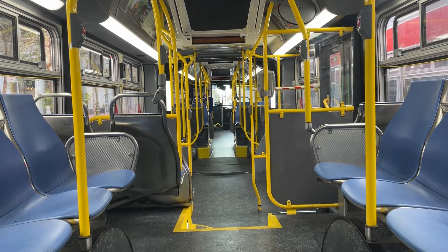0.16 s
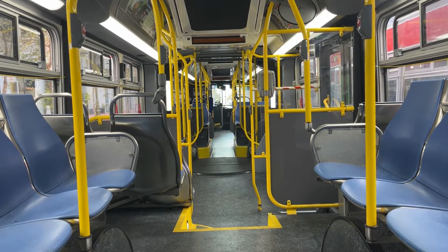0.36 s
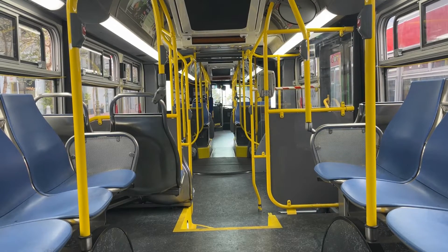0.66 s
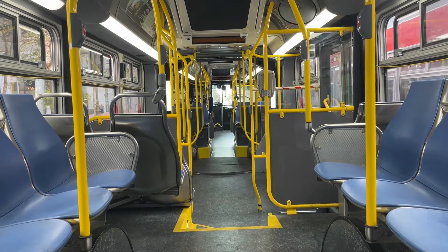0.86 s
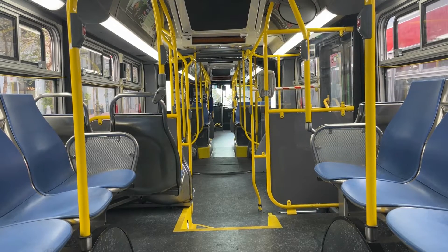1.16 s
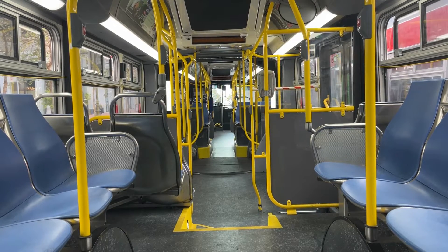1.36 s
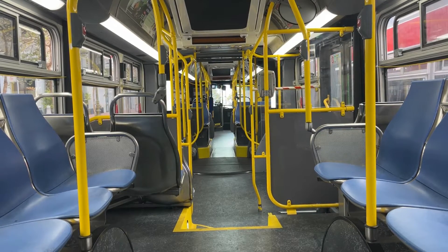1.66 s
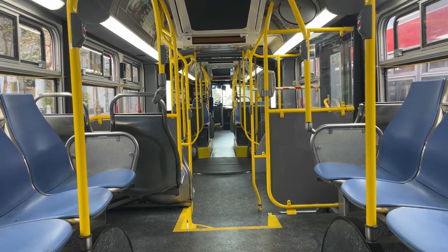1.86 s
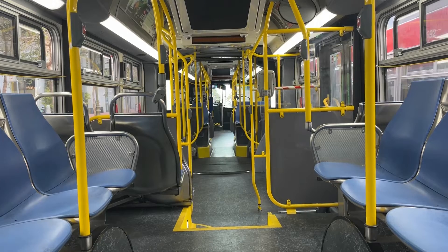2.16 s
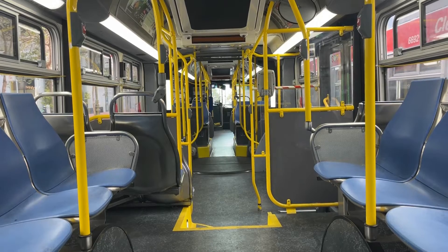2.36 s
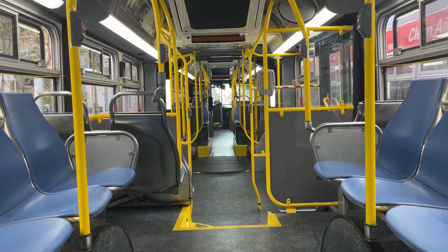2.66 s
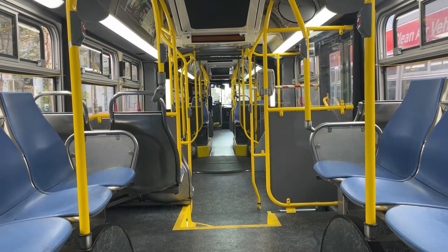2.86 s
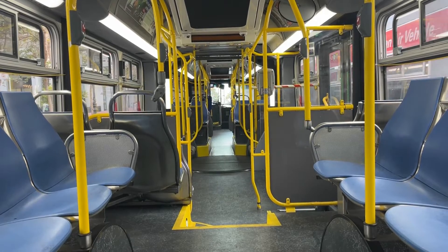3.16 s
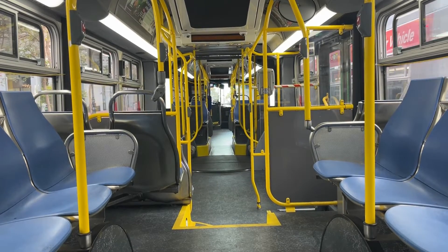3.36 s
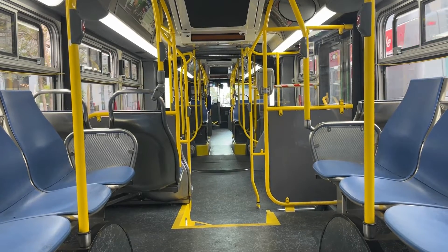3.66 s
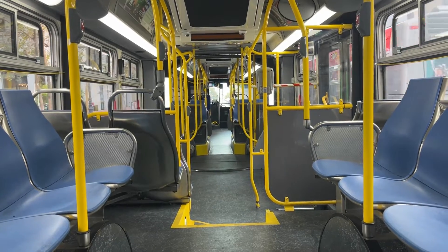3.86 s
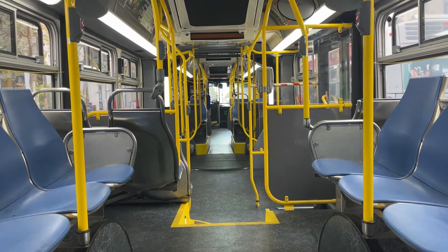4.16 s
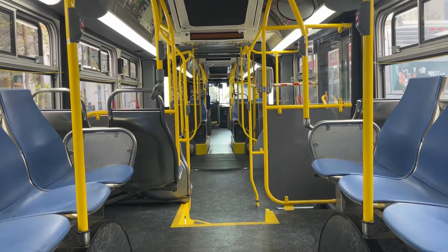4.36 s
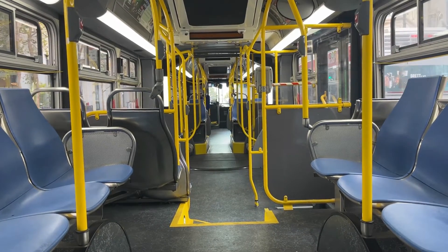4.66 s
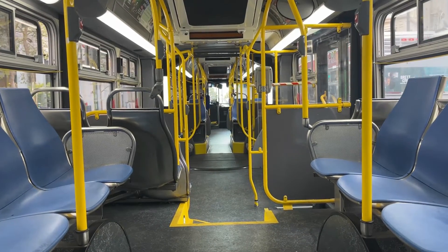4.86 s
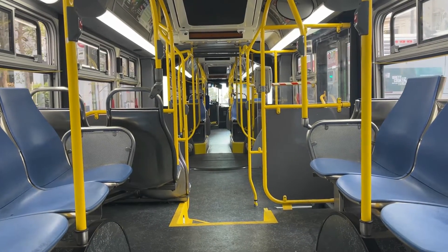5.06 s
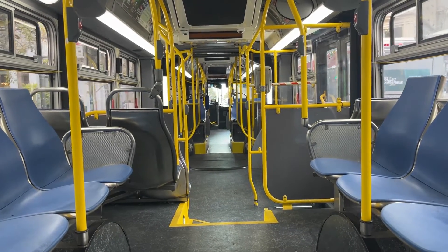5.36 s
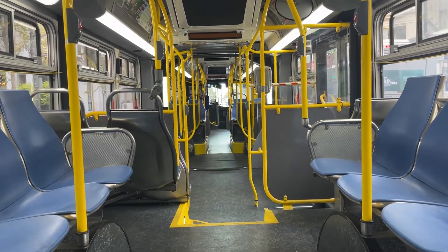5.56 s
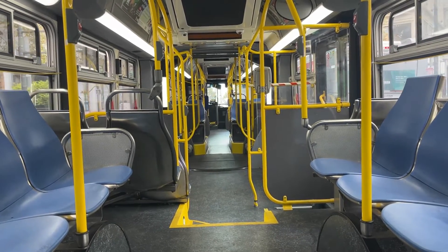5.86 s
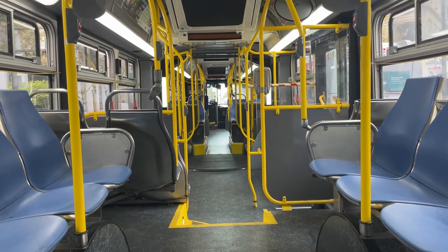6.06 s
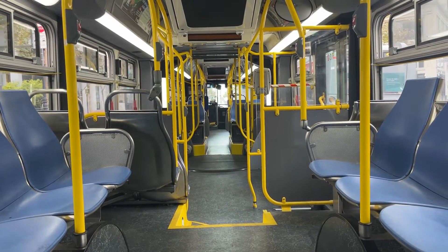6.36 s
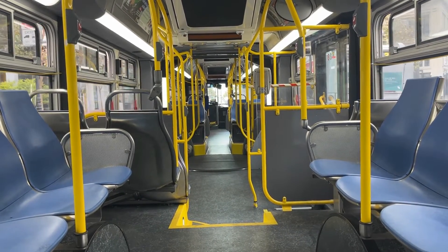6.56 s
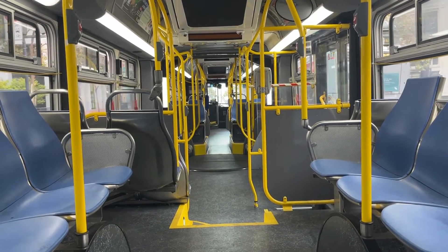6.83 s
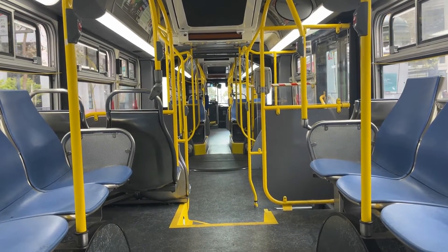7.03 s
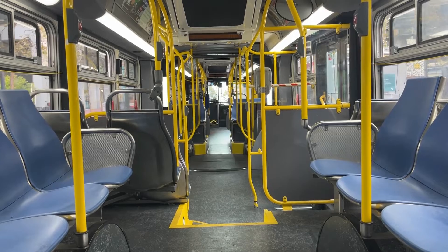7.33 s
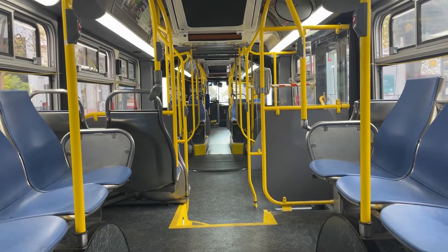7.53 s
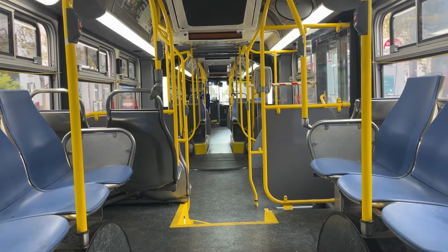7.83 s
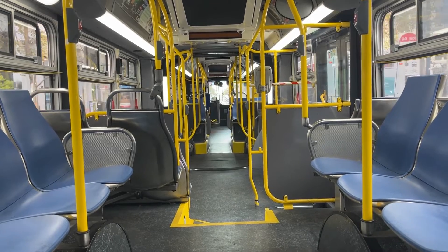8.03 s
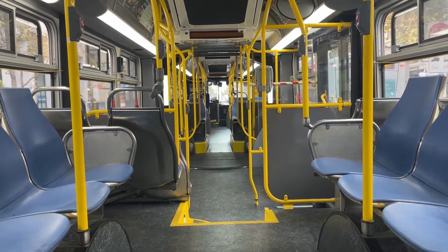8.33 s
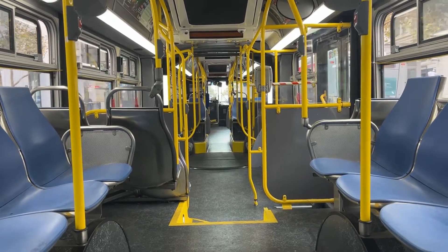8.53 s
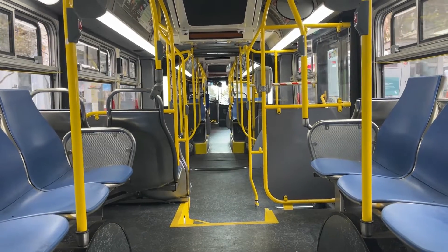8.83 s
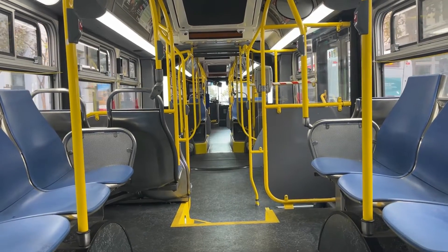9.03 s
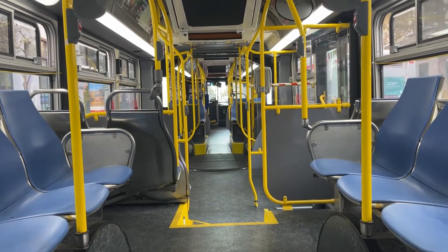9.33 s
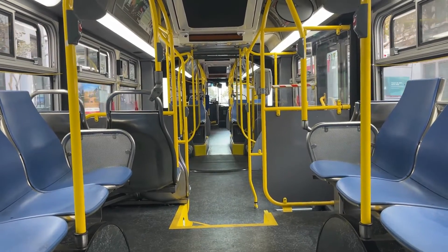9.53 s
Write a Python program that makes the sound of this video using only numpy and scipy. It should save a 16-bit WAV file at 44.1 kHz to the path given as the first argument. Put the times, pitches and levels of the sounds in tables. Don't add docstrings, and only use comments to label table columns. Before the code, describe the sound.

A bus cabin drones at idle, brake air sneezes out, and the bus pulls away with growing engine growl, floor boom and thin high squeaks.

```python
import sys
import numpy as np
from scipy import signal
from scipy.fft import rfft, irfft, next_fast_len
from scipy.io import wavfile
from scipy.ndimage import uniform_filter1d

SR = 44100
rng = np.random.default_rng(int(sys.argv[2]) if len(sys.argv) > 2 else 0)


def undo_db(level):
    steps = np.asarray(level, float) / 20
    return 10 ** steps


def dump_mix(stems):
    frames = np.atleast_2d(stems).T
    limited = np.clip(frames, -1, 1)
    pcm = np.round(limited * 32767).astype(np.int16)
    wavfile.write(sys.argv[1], SR, pcm)


N = 427329
TIME = np.arange(N) / SR
SIZE = next_fast_len(N)
BINS = np.arange(SIZE // 2 + 1) * SR / SIZE + 1e-3


def columns(table):
    s, *rest = np.transpose(table)
    return [np.interp(TIME, s, column) for column in rest]


def on_bins(points):
    hz, value = np.transpose(points)
    return np.interp(np.log(BINS), np.log(hz), value)


def resonances(table, hz):
    return sum(db / (1 + ((hz - centre) / width) ** 2) for centre, width, db in table)


def walk(rate, channels=1):
    spacing = int(SR / rate)
    knots = rng.standard_normal((channels, N // spacing + 2))
    step = (1 - np.cos(np.pi * (np.arange(N) % spacing) / spacing)) / 2
    i = np.arange(N) // spacing
    return 1.15 * (knots[:, i] * (1 - step) + knots[:, i + 1] * step)


def noise(colour, lo_hz, hi_hz):
    gain = undo_db(on_bins(colour)) * (BINS > colour[0][0]) * (BINS < colour[-1][0])
    band = gain[(BINS > lo_hz) & (BINS < hi_hz)]
    gain = gain / np.sqrt(np.sum(band ** 2) * 2 / SIZE)
    return irfft(rfft(rng.standard_normal((3, SIZE))) * gain, SIZE)[:, :N]


def tone(hz, width_hz, steady=0.):
    wander = steady + walk(width_hz, channels=3) + 1j * walk(width_hz, channels=3)
    carrier = np.exp(2j * np.pi * np.cumsum(hz) / SR)
    return (carrier * wander).real / np.sqrt(1 + steady ** 2 / 2)


# t/s, turns per second
CRANK_SPEED = [(0.0, 11.71), (1.0, 11.62), (1.25, 12.02), (1.5, 12.43), (2.0, 12.78), (2.5, 13.54),
               (3.0, 14.98), (3.5, 16.27), (4.0, 17.23), (4.5, 18.61), (5.0, 20.03), (5.5, 20.99),
               (6.0, 21.48), (6.3, 22.77), (6.6, 23.55), (7.0, 22.52), (7.4, 21.55), (8.0, 22.25),
               (8.5, 22.6), (9.0, 23.15), (9.69, 23.91)]
STRONG_ORDERS = (3, 4.5, 6, 8)
# t/s, level/dB of orders 3, 4.5, 6 and 8, load level/dB on the weaker orders
ORDER_LEVELS = [(0.0, -50, -41, -42, -30.5, 1), (0.75, -42, -49, -40, -31, 2),
                (1.0, -48, -45.0, -35, -30.5, 1), (1.25, -50, -50, -42.0, -33, -3),
                (1.5, -41, -45.0, -32, -42, -0.5), (1.75, -31, -43, -34, -32.5, -5),
                (2.0, -35, -45.0, -33, -41, -4), (2.25, -36, -47, -48, -30, 0.0),
                (2.5, -31.0, -45.0, -42, -29.0, 1), (2.75, -28, -40, -45, -32.5, -1),
                (3.0, -26, -45.0, -45, -34.0, -4.5), (3.25, -29, -36, -47, -28, -3),
                (3.5, -44, -39.0, -37.0, -25.5, -0.5), (3.75, -26.5, -39.0, -45.0, -46, -9),
                (4.0, -29, -42.0, -46, -27.5, -0.5), (4.25, -31, -41, -41, -27.5, -3.5),
                (4.5, -18, -33, -44, -30.5, -5), (4.75, -21.0, -47, -33, -37, -1),
                (5.0, -21.5, -30.5, -26, -27.5, 2.5), (5.25, -33, -28, -37, -21.5, 0.5),
                (5.5, -36, -29.0, -36.0, -34, 3.5), (5.75, -23, -30.0, -49, -39, 3),
                (6.0, -26, -40, -37, -30, 6), (6.3, -31, -24.5, -24, -25.5, -1.5),
                (6.6, -27, -19.5, -32, -25, 2.5), (6.75, -36, -19.5, -31, -28.5, 0),
                (7.0, -23, -28.5, -23, -45, 4), (7.25, -33, -24.5, -30, -27, 1),
                (7.4, -27.5, -32, -30, -32.5, 1.5), (7.75, -24, -28, -27, -27.5, 3.5),
                (8.0, -45.0, -26, -24.5, -33, 3.5), (8.25, -22, -31, -23, -41, 4),
                (8.5, -21.5, -29, -26.5, -34, 2.5), (8.75, -21.5, -24.0, -24, -39, 5),
                (9.0, -28, -22.5, -31, -32.5, 2.5), (9.25, -25, -21, -28.5, -35, 7),
                (9.69, -30, -28, -49, -50, 1.5)]
# multiple of the crank rate, level/dB
WEAK_ORDERS = [(1.5, -48), (2, -45), (2.5, -44), (4, -46), (5, -47), (7, -51), (9, -46), (10, -49.5),
               (12, -49.5), (14, -48), (15, -47), (16, -48.5)]
# f/Hz, width/Hz, level/dB
CABIN_MODES = [(60.4, 4.9, -3), (201.5, 5.1, 9), (142.4, 5.5, 11.5), (171.2, 4.9, 14), (219.5, 7.8, 16.5),
               (264.5, 5.8, 15.5), (312.7, 10.5, 17.5), (342.3, 4.6, 11.5)]


def engine():
    (rev,), (*strong, load_db) = columns(CRANK_SPEED), columns(ORDER_LEVELS)
    turn = 2 * np.pi * np.cumsum(rev) / SR
    levels = list(zip(STRONG_ORDERS, strong))
    for order, db in WEAK_ORDERS:
        levels.append((order, db + load_db + resonances(CABIN_MODES, order * rev)))
    opposed = np.array([[1], [-1]])
    out = np.zeros((2, N))
    for order, db in levels:
        phase = order * turn + rng.uniform(0, 2 * np.pi) + 0.13 * walk(4)[0]
        same = np.sin(phase)
        apart = np.sin(phase + 1.33 + 0.55 * walk(1.56)[0])
        apart_db = np.interp(order * rev, (40, 70, 300), (-15, -4, -7))
        size = np.sqrt(2) * undo_db(db + walk(6)[0])
        out += size * (same + undo_db(apart_db) * apart * opposed)
    return out


# t/s, f/Hz
GEAR_PITCH = [(4.1, 350), (4.6, 392), (5, 470), (5.2, 505), (5.6, 580), (6, 640), (6.3, 685), (6.7, 730),
              (7.1, 780), (7.5, 820), (8, 862), (8.5, 905), (8.8, 938), (9.3, 1000), (9.69, 1040)]
# t/s, level/dB
GEAR_LEVEL = [(4.1, -47), (4.6, -43), (5.2, -29.5), (5.6, -43), (6.2, -36), (6.7, -41), (7.2, -40.5),
              (8, -48.5), (8.7, -41), (9.0, -54), (9.3, -40), (9.69, -49)]


def gear():
    (hz,), (db,) = columns(GEAR_PITCH), columns(GEAR_LEVEL)
    return undo_db(db) * tone(hz, 60., steady=.5) * (TIME > GEAR_PITCH[0][0])


# t/s, road boom level/dB, panel drone level/dB, rattle and rush level/dB
BODY_LEVELS = [(0.0, -41.5, -26.5, -43), (0.38, -50, -27, -39.5), (0.73, -35, -31.5, -39.5),
               (1.0, -36, -25.5, -40), (1.32, -31, -24, -41), (1.56, -28, -22, -35.5),
               (1.75, -38.5, -25, -40), (2.08, -42, -25.5, -36), (2.53, -38.5, -24, -36),
               (2.97, -35, -22, -35), (3.29, -42, -23, -35.5), (3.48, -31, -22, -35), (3.67, -54, -19, -36),
               (3.88, -32, -21, -35.5), (4.13, -37, -20.5, -36), (4.34, -25, -18, -36),
               (4.48, -33.5, -20.5, -35.5), (4.67, -25.5, -16.5, -37), (5.05, -31, -18, -34),
               (5.23, -29, -18.5, -34.5), (5.48, -30.5, -18.5, -34), (5.86, -39, -16, -34),
               (6.18, -25, -17, -34.5), (6.45, -31.5, -18.5, -35.5), (6.77, -30, -23.5, -34),
               (7.04, -23.5, -20.5, -35.5), (7.29, -22.5, -21, -35.5), (8.15, -23, -22.5, -34.5),
               (8.47, -22, -26.5, -34), (8.66, -23, -19.5, -31), (8.98, -17.5, -20.5, -32.5),
               (9.2, -24, -22.5, -34), (9.42, -10.5, -20.5, -34), (9.58, -13, -18.5, -31),
               (9.69, -9, -19.5, -29.5)]
# f/Hz, level/dB per Hz
BOOM_COLOUR = [(12, -46), (20, -15), (54, 6.5), (103, -3.5), (120, -1.5), (160, -41), (260, -120)]
# f/Hz, level/dB per Hz
DRONE_COLOUR = [(40.0, -19), (60.0, -4.5), (85.0, -4.5), (115.0, -7.5), (160.0, -6.5), (200.0, -6),
                (240.0, -14.5), (285.0, -12), (340.0, -8), (410.0, -10), (480.0, -18.5), (560.0, -22),
                (700.0, -17.5)]
# f/Hz, level/dB per Hz
RUSH_COLOUR = [(450.0, -4.5), (650.0, -7.5), (850.0, -9.5), (1100.0, -10.5), (1400.0, -10.5), (1900.0, -19),
               (2700.0, -23.5), (3300.0, -29), (4500.0, -29.5), (6500.0, -35.5), (8200.0, -38),
               (11000.0, -43.5), (14000.0, -48.0), (15300.0, -49)]


def body():
    boom_db, drone_db, rush_db = columns(BODY_LEVELS)
    rolling_db = np.interp(TIME, (1.5, 4.5), (-11, -2.5))
    bumps_db = 0.92 * walk(3.9)
    boom = noise(BOOM_COLOUR, 25, 74) * undo_db(boom_db + rolling_db + bumps_db)
    drone = noise(DRONE_COLOUR, 61, 540) * undo_db(drone_db - 3.5 + .7 * walk(7))
    rush = noise(RUSH_COLOUR, 596, 1350) * undo_db(rush_db - .5 + 0.25 * walk(9))
    return boom + drone + rush


# f/Hz, level/dB per Hz
JET_COLOUR = [(300.0, -9), (600.0, -7), (1100.0, -10.5), (1600.0, -6), (2300.0, -11.0), (2700.0, -9),
              (3300.0, -9.5), (4300.0, -9.0), (5500.0, -10.5), (6500.0, -12.5), (7500.0, -12),
              (8200.0, -15), (9500.0, -4), (12000.0, -13.0)]
# f/Hz, level/dB per Hz
JET_TOP = [(9000.0, 2.5), (10000.0, 1.5), (11000.0, -0.5), (12000.0, 0), (13000.0, -1.0), (14000.0, -2.5),
           (14800.0, -5), (15300.0, -8.0)]


def air_jet(table, lo_hz, hi_hz, trim_db):
    db, bright_db = columns(table)
    is_open = 1. * (TIME > table[0][0]) * (TIME < table[-1][0] + .01)
    gate = uniform_filter1d(is_open, size=900)
    low_colour = [p for p in JET_COLOUR if p[0] < 9000] + [(9000, JET_COLOUR[-2][1])]
    low = noise(low_colour, lo_hz, hi_hz)
    top = noise(JET_TOP, 11200, 13500)
    return gate * undo_db(db + trim_db + 0.93 * walk(25)) * (low + undo_db(bright_db) * top)


# t/s, level/dB, brightness/dB
BRAKE_DUMP = [(1.0, -49, -17), (1.03, -59, -9), (1.07, -34, -3), (1.1, -28.5, -5), (1.156, -26.5, -2),
              (1.26, -28.5, -6.5), (1.304, -30, -3), (1.426, -25.5, -4.5), (1.624, -28, -5.5),
              (1.702, -33.5, -10.5), (1.862, -50.5, -14), (1.95, -53, -10)]


def brake_dump():
    return air_jet(BRAKE_DUMP, 2040, 7000, .1)


# t/s, level/dB, brightness/dB
AIR_LEAKS = [(6.45, -57, -18), (6.55, -66, -19), (6.57, -66, -1), (6.62, -51.5, 1), (7.5, -59.5, -7),
             (7.62, -56, -24), (7.81, -57, -27), (7.88, -58, -4), (8.15, -60, -3), (8.56, -52.5, -3),
             (8.71, -51, -11), (8.72, -41, -38), (8.73, -45, -15), (8.8, -43, 2.5), (9.13, -55.5, 0),
             (9.26, -58, -6), (9.62, -48.5, -4), (9.64, -43, 1), (9.69, -43, -6)]


def air_leaks():
    return air_jet(AIR_LEAKS, 3940, 5300, -1.2)


def ring(table, width_hz, rise_s):
    out = np.zeros((3, N))
    for s, db, hz, t60 in table:
        age = np.clip(TIME - s, 0, None)
        envelope = undo_db(db - 4.5 - 60 * age / t60) * (1 - np.exp(-age / rise_s))
        flutter_hz = 0.22 * width_hz * walk(15)[0]
        out += envelope * tone(hz + flutter_hz, width_hz)
    return out


# t/s, peak level/dB, f/Hz, t60/s
SQUEAL_HIGH = [(6.4014, -48, 10200, 0.35), (6.7625, -37, 10240, 0.32), (7.1357, -39, 9950, 0.23),
               (7.1776, -44, 10000, 0.35), (7.5702, -29, 10270, 0.42), (7.6735, -25, 10430, 0.53),
               (7.7912, -33, 10220, 0.35), (8.0716, -30.5, 10140, 0.35), (8.326, -35, 10200, 0.37),
               (8.4347, -34, 10170, 0.41), (8.5021, -33, 10360, 0.44), (8.71, -19, 10450, 0.32),
               (8.8428, -31, 10300, 0.29), (8.9171, -39, 10400, 0.35), (9.1641, -38, 10200, 0.39),
               (9.3157, -34, 10240, 0.28), (9.4649, -34, 10300, 0.43), (9.5701, -31, 10300, 0.44),
               (9.637, -32, 10450, 0.32)]
# t/s, peak level/dB, f/Hz, t60/s
SQUEAL_MID = [
    (7.5373, -31, 7670, 0.4),
    (7.6286, -36, 7660, 0.4),
    (7.6849, -38, 7670, 0.48),
    (8.6712, -26, 7760, 0.4),
    (8.7594, -43, 7700, 0.4),
    (8.9072, -30, 7810, 0.59),
]
# t/s, peak level/dB, f/Hz, t60/s
SQUEAL_LOW = [
    (8.4776, -45, 6380, 0.5),
    (8.6872, -36, 6530, 0.5),
    (8.8613, -29, 6500, 0.47),
    (9.0034, -43, 6590, 0.5),
    (9.4634, -34.5, 6500, 0.55),
    (9.6335, -30, 6330, 0.45),
]


def squeals():
    high = ring(SQUEAL_HIGH, 110, .004)
    mid = ring(SQUEAL_MID, 90, .005)
    low = ring(SQUEAL_LOW, 330, .012)
    return high + mid + low


# t/s, peak level/dB, t60/s
KNOCKS = [
    (2.0393, -45, 0.18),
    (3.7015, -44, 0.09),
    (4.4638, -43, 0.13),
    (4.9494, -44, 0.13),
    (8.7804, -32.5, 0.12),
    (9.643, -30.5, 0.073),
]


def knocks():
    shape = np.zeros(N)
    for s, db, t60 in KNOCKS:
        age = np.clip(TIME - s, 0, None)
        shape += undo_db(db - 8.0 - 60 * age / t60) * (TIME > s)
    return shape * noise([(1500, 14.5), (5000, 6.5), (9000, 3.0), (15000, -4)], 9100, 14300)


# start t/s, end t/s, start f/Hz, end f/Hz, width/Hz
WHISTLES = [(0, 1.7, 9950, 9950, 60), (1.68, 3.9, 9930, 9900, 60), (3.3, 5.9, 9900, 9950, 60),
            (2.03, 2.42, 11250, 11250, 60), (3.7, 3.98, 3860, 3790, 25), (3.98, 4.11, 3760, 3735, 25),
            (4.11, 4.2, 3730, 3700, 25), (.58, .8, 2800, 2880, 330), (0, 3.5, 4900, 4900, 1200),
            (1.07, 1.55, 2450, 2620, 450), (1.45, 1.76, 2650, 2650, 220), (8.62, 8.7, 9900, 9900, 400),
            (8.8, 9.2, 10000, 9750, 700), (9.33, 9.6, 10000, 9900, 500), (8.06, 8.16, 10100, 9900, 500),
            (1.7, 2.7, 266, 265, 3), (2.93, 3.5, 258, 266, 2), (5.2, 8.2, 1110, 1125, 90)]
WHISTLE_LEVELS = [-79, -56, -70.5, -65, -52, -48, -54, -49, -55, -38, -38, -47, -42, -47, -48, -38.5, -29,
                  -45.5]


def whistles():
    out = np.zeros((3, N))
    for (start, end, hz0, hz1, width_hz), db in zip(WHISTLES, WHISTLE_LEVELS):
        length = end - start
        fade_in = (TIME - start) / min(.08, length / 5)
        fade_out = (end - TIME) / length * 4
        fade = np.clip(np.minimum(fade_in, fade_out), 0, 1)
        hz = np.interp(TIME, (start, end), (hz0, hz1))
        out += undo_db(db) * fade * tone(hz, width_hz, steady=3 * (width_hz < 70))
    return out


# f/Hz, level/dB per Hz
FAN_COLOUR = [(30.0, -27), (60.0, -1), (110.0, -10), (200.0, -3), (400.0, -0.5), (650.0, -17.5),
              (1000.0, -12.5), (1400.0, -25), (2500.0, -26), (5000.0, -35.5), (7000.0, -48), (10000.0, -38),
              (13500.0, -54.5), (15300.0, -57)]


def fan():
    return noise(FAN_COLOUR[1:], 80, 530) * undo_db(-34)


# f/Hz, width/Hz, level/dB
RIDGES = [(1123, 39, 3.5), (1374, 59, -4), (1643, 33, 4), (2100, 60, -1), (2710, 130, 1.5),
          (3960, 440, 0.5)]
# f/Hz, phase/rad
PORT_PHASE = [(0, 0), (430, 0.1), (1550, -2.6), (1810, -6.0), (2760, -5.8), (3790, -6.2), (5000, -5.3),
              (5680, -8.0), (6460, -7.4), (7670, -9.2), (8530, -9.4), (11400, -12.4), (12300, -12.6),
              (15200, -15.8)]
# f/Hz, shared part 0-1
PORT_LIKE = [(45, 0.94), (70, 0.27), (125, 0.74), (250, 0.92), (500, 0.26), (1000, 0.31), (2000, 0.61),
             (4000, 0.09), (6000, 0.2), (8200, 0.87), (14000, 0.68)]
# f/Hz, level/dB
PORT_BALANCE = [(60, 0.5), (110, 3), (200, 0), (380, 1), (700, 2.0), (1290, 0), (2380, 2.5), (4400, 4.5),
                (8120, -0.5), (15000, 0.0)]


def at_ports(paths):
    shared, left, right = rfft(paths, SIZE) * undo_db(resonances(RIDGES, BINS))
    like = np.clip(on_bins(PORT_LIKE), 0, 1)
    common, own = np.sqrt(like), np.sqrt(1 - like)
    lead = np.exp(.5j * np.interp(BINS, *np.transpose(PORT_PHASE)))
    tilt = undo_db(on_bins(PORT_BALANCE) / 2)
    left_port = tilt * (common * shared * lead + own * left)
    right_port = (common * shared / lead + own * right) / tilt
    return irfft(np.array([left_port, right_port]), SIZE)[:, :N]


def scene():
    paths = gear() + body() + brake_dump() + air_leaks()
    paths += squeals() + knocks() + whistles() + fan()
    return engine() + at_ports(paths)


def top_cut(x):
    return signal.sosfilt(signal.butter(12, 15700, fs=SR, output="sos"), x)


# start t/s, end t/s, from f/Hz, to f/Hz
DROPOUTS = [
    (7.578, 7.635, 10900, 16000),
    (7.668, 7.82, 11000, 16000),
    (7.585, 7.76, 8100, 9600),
    (8.1, 8.13, 11500, 16000),
    (8.325, 8.36, 11800, 16000),
    (8.44, 8.485, 10800, 16000),
    (8.71, 8.745, 11300, 16000),
    (9.34, 9.375, 12300, 16000),
    (9.28, 9.42, 7600, 8900),
]


def record(dry):
    spectrum = rfft(dry, SIZE)
    mix = dry
    for start, end, lo_hz, hi_hz in DROPOUTS:
        gap = uniform_filter1d(1. * (TIME > start) * (TIME < end), size=400)
        lost = irfft(spectrum * (BINS > lo_hz) * (BINS < hi_hz), SIZE)[:, :N]
        mix = mix - gap * lost
    return top_cut(mix)


dry = scene()
out = record(dry)
dump_mix(out)
```